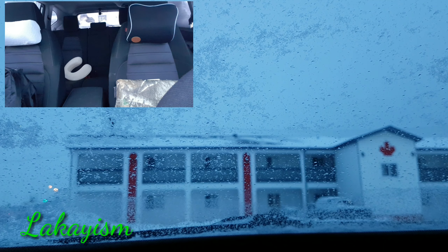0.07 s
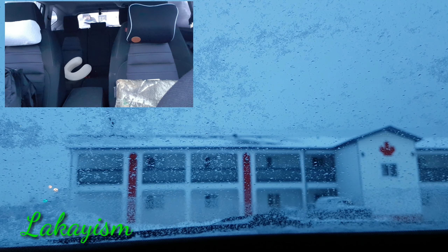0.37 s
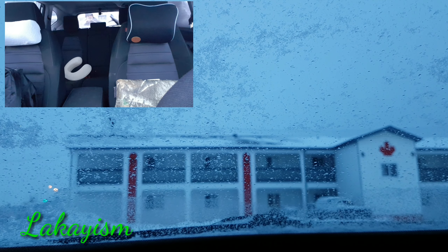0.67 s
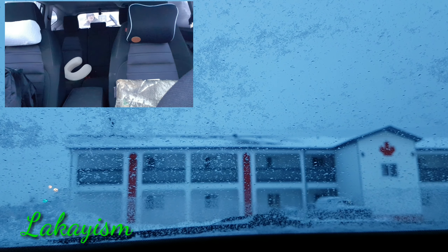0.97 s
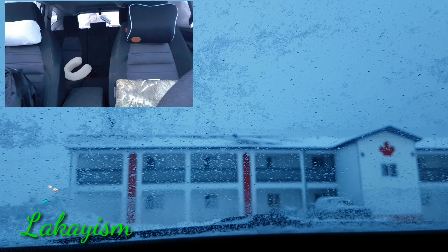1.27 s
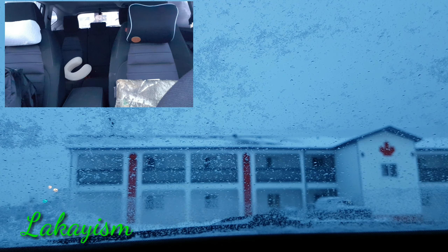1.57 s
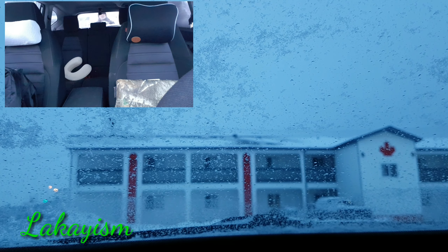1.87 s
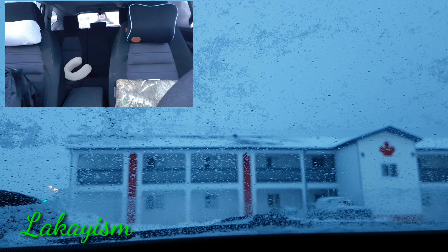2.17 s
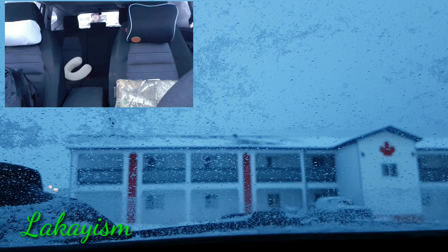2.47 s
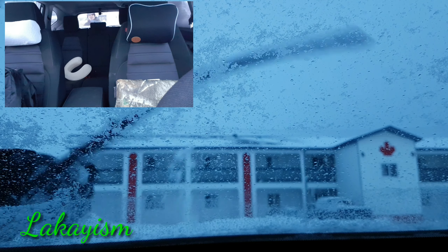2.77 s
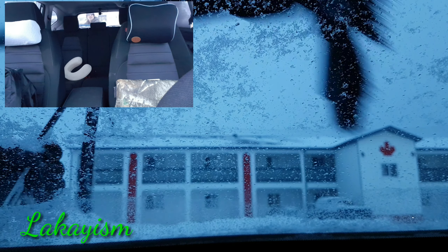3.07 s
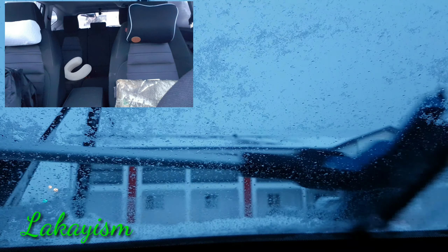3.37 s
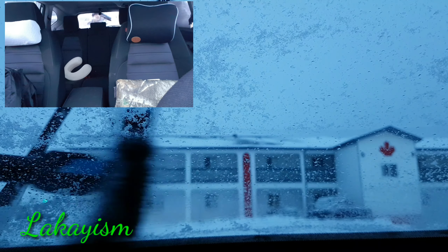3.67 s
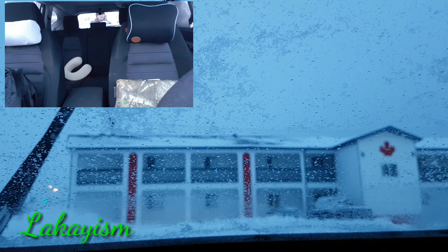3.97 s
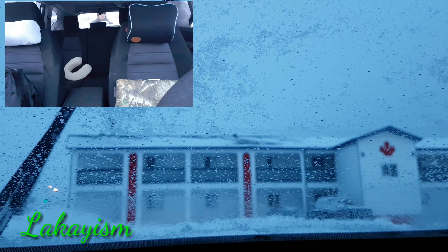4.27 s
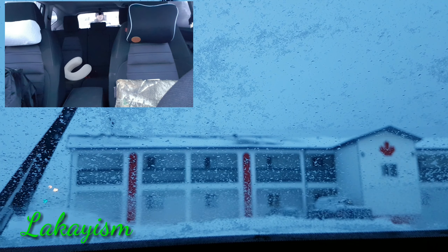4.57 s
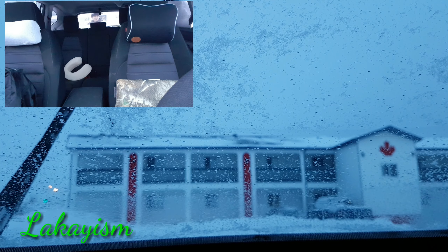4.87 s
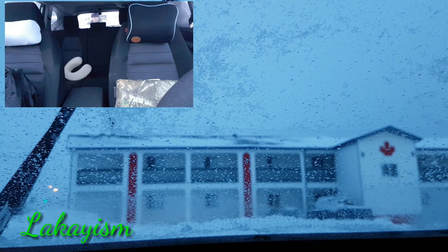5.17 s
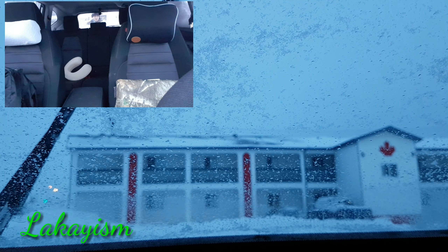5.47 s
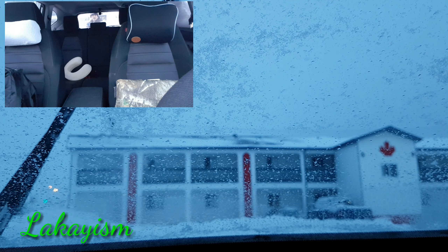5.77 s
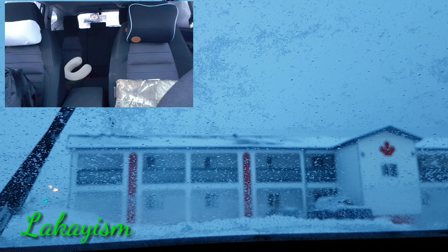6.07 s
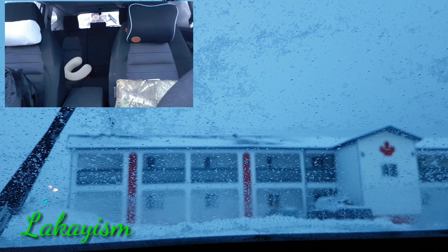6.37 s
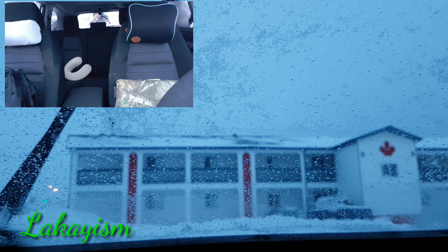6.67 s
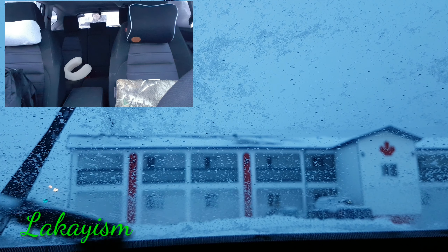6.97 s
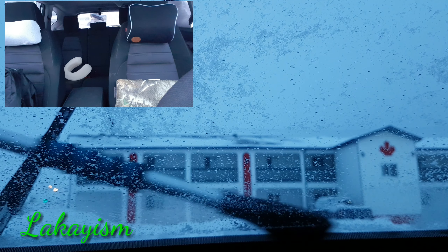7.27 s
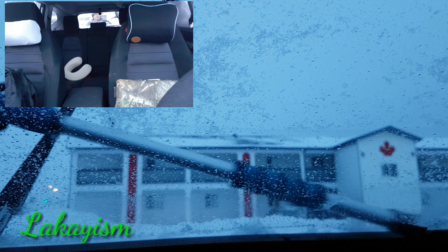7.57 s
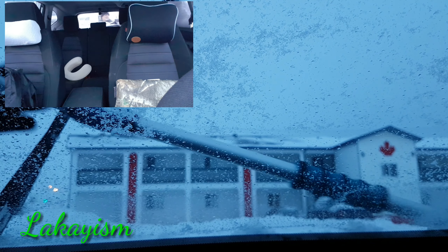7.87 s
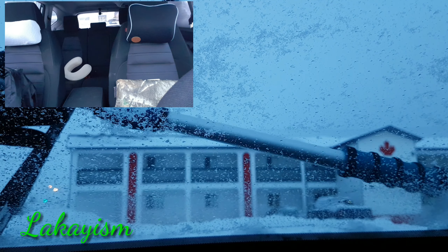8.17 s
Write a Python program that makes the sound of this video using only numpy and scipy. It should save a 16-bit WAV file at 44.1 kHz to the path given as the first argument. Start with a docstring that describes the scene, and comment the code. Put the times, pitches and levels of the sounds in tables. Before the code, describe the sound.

Snow and ice are cleared from a windshield, heard close from inside the car over a steady engine idle and heater rush. A few brief bristly scrapes and thumps come first, followed by a muffled push of snow and a longer sweep. The wiper arm gives several short clinks as it is knocked. Finally, louder gritty scraping and rapid knocks make the glass boom while ice crackles.

```python
"""Snow is swept and scraped off a windshield, heard in the small cabin over the idling engine and heater.
First come short strokes: bristles hiss and crunch over icy glass, and the brush head knocks on the pane.
Snow is shoved aside in a dull rumble, one long sweep swells, and a knocked wiper arm pings.
From about 6 s the scraping turns hard: the pane drums and booms under quick blows that crack the ice."""
import sys
import numpy as np
from scipy import signal
from scipy.fft import rfft, irfft, next_fast_len
from scipy.io import wavfile
from scipy.ndimage import map_coordinates

SR = 44100
rng = np.random.default_rng(int(sys.argv[2]) if len(sys.argv) > 2 else 0)


def store_wav(level_fs):
    """Save 16-bit WAV to argv[1]."""
    pcm = np.round(np.clip(np.atleast_2d(level_fs), -1, 1) * 32767)
    wavfile.write(sys.argv[1], SR, pcm.T.astype(np.int16))


N = 362502
TIME = np.arange(N) / SR

# Brush strokes: start_s, length_s, pressure_db, swell_db, hard_edge_db, loose_snow_db
BRUSH_STROKES = [(0.236, 0.22, -53.5, 9, 7, -5), (0.517, 0.023, -26, 5.5, -7, -7),
                 (0.557, 0.075, -39.5, 0, 4, -10), (0.643, 0.058, -29.5, 3.5, -16, -3.5),
                 (0.709, 0.19, -47, 3, 10.5, -8), (1.155, 0.14, -34, -3, -5, -5),
                 (1.295, 0.033, -32.5, -4, -1, -18), (3.42, 0.9, -42, 6.5, -2, -5.5),
                 (4.22, 0.101, -34.5, -0.5, -2, -6), (4.324, 0.043, -39.5, -7, 2, 1.5),
                 (6.276, 0.033, -19.5, 4, -1.5, -22), (6.417, 0.034, -52, 8, 0, 2),
                 (6.694, 0.13, -21.5, -8.5, -0.5, -25), (7.024, 0.272, -25, 0, -2.5, -20),
                 (7.313, 0.18, -24.5, 0.5, -2.5, -20), (7.508, 0.31, -24, -1, 3, -23),
                 (7.847, 0.035, -41, 12, 10, -14), (7.951, 0.016, -31, 5.5, 8, -18),
                 (7.99, 0.18, -43, -3, -1, -29), (8.12, 0.079, -21.5, 3, 5, -18)]
def stroke_gain(share_db=0, growth=1, land_s=0.0048, lift_s=0.013):
    """The brush lands quickly, presses harder or eases off evenly, and springs off more slowly."""
    gain = np.zeros(N)
    shares_db = share_db + np.zeros(len(BRUSH_STROKES))
    for (start, length, db, swell_db, *_), extra_db in zip(BRUSH_STROKES, shares_db):
        near = slice(max(int((start - 10 * land_s) * SR), 0), int((start + length + 10 * lift_s) * SR))
        t = TIME[near] - start
        fade = np.exp(-np.maximum(-t / land_s, (t - length) / lift_s).clip(0))
        pressure_db = db + swell_db * ((t / length).clip(0, 1) - .5)
        gain[near] = np.maximum(gain[near], amp(growth * pressure_db + extra_db) * fade)
    return gain


# Tone colours of the brush layers: freq_hz, level_db
SCRAPE_EQ = [(900, -45), (1500, -10), (1900, -1), (2350, 3.5), (3000, -2.5), (3600, -7), (4500, -9.5),
             (6000, -22), (9000, -25.5)]  # bristles biting on ice
GRIND_EQ = [(200, -23), (380, -5.5), (650, 3.5), (950, -4), (1300, -4), (1800, -11), (3000, -28.5)]  # throaty hard edge
DRUM_EQ = [(35, -20), (60, -14), (78, -10.5), (105, -8.5), (140, 1), (178, 0), (225, -6.5), (290, -13),
           (450, -17), (1000, -61)]  # low body of the pane
HISS_EQ = [(2500, 1), (4500, 0.5), (6000, 0.5), (7900, 0.5), (9200, -12.5), (12000, -18)]  # bright bristle tips
FIZZ_EQ = [(6000, -20), (9000, -16), (11000, -3.5), (13000, 1.5), (15500, -1)]  # airy loose snow
def brush(hiss_db=-19, drum_db=7, judder_db=2.5, firm_db=-36, pan_db=1):
    """A light sweep hisses evenly; pressed firmly, bristles catch and slip on ice and shake the pane."""
    *_, edge_db, snow_db = np.transpose(BRUSH_STROKES)
    pressure = stroke_gain()
    firm = pressure / (pressure + amp(firm_db))
    judder = amp(judder_db * firm * drift(110))
    catches = .65 * firm * grains(per_s=54, spread_db=-2)  # now and then a ridge of ice gives way
    crunch = unit(grains(per_s=1400, spread_db=4.5) * judder + catches)
    bristles = firm * crunch + np.sqrt(1 - firm ** 2) * rng.standard_normal(N)
    scrape = pressure * unit(tint(bristles, SCRAPE_EQ))
    edge_slips = grains(per_s=830, spread_db=3) * judder
    grind = np.sqrt(firm) * stroke_gain(edge_db) * unit(tint(edge_slips, GRIND_EQ))
    drum = amp(drum_db) * firm * stroke_gain(land_s=0.002, lift_s=0.014) * noise(DRUM_EQ)
    # countless bristle tips and snow crystals sound from all over the brush
    tips = judder * (rng.standard_normal((2, N)) + 0.45 * firm * crunch)
    hiss = amp(hiss_db) * stroke_gain(growth=0.69) * unit(tint(tips, HISS_EQ))
    fizz = stroke_gain(snow_db) * unit(tint(tips, FIZZ_EQ))
    pan = amp(pan_db * np.array([[.5], [-.5]]))
    patches = amp(-0.15 * drift(30))  # the frost lies unevenly
    return pan * patches * (travelling(scrape + grind) + hiss + fizz) + drum


def grains(per_s, spread_db):
    """Tiny slips and breaking ice crystals click at random times and in uneven sizes."""
    size = amp(spread_db * np.minimum(rng.exponential(1, N), 4))
    return unit(size * rng.choice([-1, 1], N) * (rng.random(N) < per_s / SR))


# Blows on the pane: start_s, strength_db, thump_hz, hardness (0-1), ice_db
BLOWS = [(0.554, -8.5, 141, 0, -1), (0.651, -24, 222, 0.89, -15), (0.678, -28.5, 187, .96, 2),
         (0.724, -19.5, 180, 0.76, -8), (1.161, -23, 247, 0.99, -14), (1.172, -10, 170, 0.32, 14.5),
         (1.22, -18, 150, 0.73, 1.5), (1.562, -22, 150, 0, -10), (2.421, -18.5, 198, .72, 10),
         (2.506, -13.5, 166, 0.64, 2), (2.537, -3, 179, 0.27, 2), (2.593, -12, 105, 0.49, -22),
         (2.691, -16, 185, 0.3, -18), (2.95, -30, 156, 0.92, -23), (3.026, -22, 158, 0.69, -22),
         (3.332, -13, 66, 0.61, -9.5), (3.353, -5, 168, 0.52, -6), (3.372, -10, 92, .15, 7),
         (3.433, -18.5, 220, 0.56, -17), (3.543, -30.5, 147, 0.96, -1), (3.92, -8.5, 148, 0, -10),
         (5.193, -11, 244, 0.71, -10), (5.675, -17, 51.6, .15, -15), (5.746, -34, 159, 0.67, 5),
         (5.879, -16, 192, 0.54, -1), (5.886, -16, 290, 0.9, -28), (5.893, -13, 288, 0.74, -11),
         (6.151, -17.5, 172, 0.88, -26), (6.204, -30, 200, 0.91, -17), (6.276, -18.5, 228, 1, -8),
         (6.296, -5, 170, 0.69, -4), (6.318, -6, 125.5, 0.54, -12), (6.689, -12.5, 151, 0.63, 3),
         (6.707, -5.5, 182, 0.52, -5), (6.904, -35, 166, 0.88, -7), (7.002, -17.5, 169, 0.71, -15),
         (7.049, -25.5, 153, 1, -5), (7.108, -13, 141, 0.86, -8), (7.148, -10.5, 231, 0.6, -8),
         (7.227, -15.5, 142, 0.88, -28), (7.285, -14.5, 208, 0.76, -21), (7.416, -9.5, 198, 0.68, -1),
         (7.523, -8.5, 212, .66, -16), (7.6, -12, 79.5, 0.75, -4), (7.626, -6, 70.3, 0.1, -17),
         (7.666, -6, 199, 0.7, 0.5), (7.742, -7.5, 172, 0.61, 2), (7.792, -6.5, 171, 0.74, -3.5),
         (7.814, -2, 181, 0.4, -3), (7.89, -23, 192, 0.71, -4), (7.959, -22.5, 113, 0.82, -17)]
# Glassy snap of the crowded high modes: pitch_ratio, level_db
SNAP_EQ = [(.4, -10.5), (.68, -4.5), (1, 4.5), (1.25, -4.5), (1.55, -15.5), (2.2, -23), (4, -54)]
# Brittle crack of ice: freq_hz, level_db
CRACK_EQ = [(600, 11.5), (1100, 6.5), (1600, 1.5), (2500, 3), (3300, 4), (4500, 4.5), (7700, 2.5),
            (9200, -6), (12000, -2), (15500, 1.5)]
def knocks(thump_db=2, thump_cycles=14, rise_s=0.012):
    """A blow flexes the pane in a low thump; harder ones ring its modes more and crack the ice."""
    t = np.arange(SR // 3) / SR
    out = np.zeros((2, N))
    for start, db, thump_hz, hardness, ice_db in BLOWS:
        clack_db = db + np.interp(hardness, [0, 1], [-22, -2.5])
        snap_db = db + np.interp(hardness, [0, 1], [-46.5, 3])
        clack_hz = 259.4 + 1.38 * thump_hz  # a stiffer spot both thumps and rings higher
        snap_hz = 2574 * np.exp(0.026 * rng.standard_normal())
        centre, side = unit(tint(rng.standard_normal((2, len(t))), DRUM_EQ))
        flex = np.sin(2 * np.pi * thump_hz * t) + 0.5 * centre + 0.16 * np.array([side, -side])
        swing = (1 - np.exp(-t / rise_s)) * amp(-60 * t * thump_hz / thump_cycles)
        thump = amp(db + thump_db) * unit_attack(flex * swing)
        clack = amp(clack_db) * pane_ring(t, clack_hz)
        snap = amp(snap_db) * burst(t, np.array(SNAP_EQ) * [snap_hz, 1], t60=0.068, spike=0.3)
        crack = amp(snap_db + ice_db) * burst(t, CRACK_EQ, t60=0.11, spike=3.9)
        add(out, start, thump + cabin(clack + snap + crack, t60=0.059, wet_db=2.5))
    return out


# Low modes of the windshield: pitch_hz, level_db, t60_s (before extra damping)
PANE_MODES = [(272, 5, 0.087), (381, 5.5, 0.12), (460, -1.5, 0.15), (552, -11, 0.15), (666, -9.5, 0.27),
              (752, -4, 0.063), (774, -9, 0.26), (959, -1, 0.091), (1035, 10, 0.023), (1096, -10, 0.062),
              (1250, 1, 0.036), (1300, -11, 0.052), (1743, 16.5, 0.047), (1970, -7, 0.13)]
def pane_ring(t, centre_hz, width_octaves=0.83, damping=1.06, note_t60=0.062, note_share=0.27):
    """The place of the blow favours one note and those modes of the pane that lie around it."""
    hz, db, t60 = np.transpose(PANE_MODES)[:, :, None]
    weight = np.exp(-.5 * (np.log2(hz / centre_hz) / width_octaves) ** 2) * rng.choice([-1, 1], hz.shape)
    decay = amp(db - 60 * damping * t / t60)
    modes = unit_attack((weight * decay * np.sin(2 * np.pi * hz * t)).sum(0))
    note = unit_attack(np.sin(2 * np.pi * centre_hz * t) * amp(-60 * t / note_t60))
    return unit_attack(note_share * note + (1 - note_share) * modes)


def burst(t, colour, t60, spike):
    """A sharp transient, then a noisy tail of many close modes dying together."""
    envelope = amp(-60 * t / t60) + spike * np.exp(-t / 0.0018)
    return unit_attack(tint(rng.standard_normal(len(t)), colour) * envelope)


# Swell of snow shoved along the foot of the pane: time_s, level_db
SNOW_SHOVE = [(2.59, -18), (2.66, -25), (3.04, -17), (3.08, -32), (3.3, -20.5)]
# Swell of the pane flexing deeply under the brush: time_s, level_db
PANE_SHUDDER = [(7.52, -39), (7.562, -10), (7.644, -12), (7.7, -5.5), (7.8, -20)]
# Bass boom of that flex: freq_hz, level_db
BOOM_EQ = [(40, -30), (62, -23), (75, -2), (90, -1), (125, -33), (300, -84)]
def pushes(shove_db=-4, shudder_db=-6):
    """Pushing on the snow or leaning on the glass shakes the pane in a dull rumble."""
    out = np.zeros((2, N))
    for swell, colour, db in (SNOW_SHOVE, DRUM_EQ, shove_db), (PANE_SHUDDER, BOOM_EQ, shudder_db):
        swell_db = np.interp(TIME, *np.transpose(swell), left=-100, right=-100)
        out += amp(db + swell_db) * noise(colour)
    return out


# Pings of the wiper arm: start_s, pitch_hz, level_db, t60_s
WIPER_PINGS = [(2.951, 2356, -27.5, 0.1), (2.951, 2860, -33, 0.11), (4.301, 3200, -26, 0.07),
               (5.195, 2356, -24, 0.12), (5.196, 2630, -14.5, 0.031), (5.674, 404, -17, 0.1),
               (5.889, 640, -8.5, 0.091), (5.89, 3090, -19, .08), (6.152, 840, -13, 0.048),
               (6.153, 2930, -35, 0.25)]
def wiper(rise_s=0.00098):
    """A knocked wiper arm and its hollow cover ring in short, clear notes."""
    t = np.arange(SR // 4) / SR
    out = np.zeros((2, N))
    for start, hz, db, t60 in WIPER_PINGS:
        envelope = (1 - np.exp(-t / rise_s)) * amp(db - 60 * t / t60)
        add(out, start, envelope * np.sin(2 * np.pi * (hz * t + rng.random((2, 1)) / 5)))
    return out


# Tone colours of the dark engine rumble and the fan's rush of air: freq_hz, level_db
RUMBLE_EQ = [(15, -25), (28, -31), (42, -4), (62, -4.5), (85, -1), (112, -1.5), (150, 1), (215, -1.5),
             (265, -10.5), (350, -7.5), (450, -17), (700, -22), (1500, -59)]
FAN_EQ = [(200, -0.5), (450, 2), (700, -1), (1000, 1), (1400, -7.5), (2000, -10.5), (3100, -18),
          (3700, -22), (5500, -30), (8200, -32), (9200, -47), (11000, -44), (13000, -32), (15500, -36)]
# Hum of engine and fan: pitch_hz, level_db
HUM_TONES = [(43, -38), (85, -34.5), (154, -41), (219, -40.5), (360, -44.5), (722, -55)]
# The background bed dips briefly: time_s, gain_db
BED_DIP = [(0, 0), (6.25, -0.14), (6.5, -3.2), (7, -2), (8.22, -0.5)]
def idling_car(rumble_db=-25.5, fan_db=-36.5, throb_db=1.45, waver_cycles=0.51):
    """Idle rumble and wavering tones come through the body; the heater fan blows evenly over them."""
    rumble = amp(rumble_db + throb_db * drift(25)) * noise(RUMBLE_EQ)
    fan = amp(fan_db) * noise(FAN_EQ)
    hum = sum(amp(db) * unit(np.sin(2 * np.pi * (hz * TIME + waver_cycles * drift(4))))
              for hz, db in HUM_TONES)
    return amp(np.interp(TIME, *np.transpose(BED_DIP))) * (rumble + fan + hum)


def cabin(x, t60, wet_db):
    """Each ear gets the direct sound and its own dense, short reflections from glass and trim."""
    t = np.arange(SR // 10) / SR
    taps = rng.standard_normal((2, len(t))) * (rng.random((2, len(t))) < 4000 / SR) * amp(-60 * t / t60)
    taps *= amp(wet_db) / np.linalg.norm(taps, axis=1, keepdims=True)
    taps[[0, 1], rng.integers(0, 8, 2)] += 1  # direct sound
    return signal.oaconvolve(x[None], taps, axes=1)[:, :len(x)] / np.sqrt(1 + amp(2 * wet_db))


def travelling(x, size=4096):
    """The brush moves over the pane, so its reflections in the cabin keep changing."""
    out, window = np.zeros((2, N)), signal.windows.cosine(size)
    for start in range(0, N - size // 2, size // 2):
        piece = x[start:start + size]
        faded = np.pad(piece * window[:len(piece)], (0, size))
        add(out, start / SR, cabin(faded, t60=0.049, wet_db=12.5))
    return out


# Stereo width, side against mid: freq_hz, side_db
STEREO_WIDTH = [(30, -20), (70, -13.5), (150, -20), (300, -13.5), (600, -4.5), (1200, -0.5), (15000, 0.5)]
def noise(colour):
    """Coloured stereo noise, narrow in the bass and wide in the treble."""
    mid, side = tint(rng.standard_normal((2, N)), colour)
    side = tint(side, STEREO_WIDTH)
    return unit(np.array([mid + side, mid - side]))


def tint(x, points):
    """Filters by an EQ curve of (freq_hz, level_db) points."""
    hz, db = np.transpose(points)
    size = next_fast_len(x.shape[-1])
    gain = amp(np.interp(np.log(np.fft.rfftfreq(size, 1 / SR) + 1), np.log(hz), db))
    return irfft(rfft(x, size) * gain, size)[..., :x.shape[-1]]


def drift(per_s):
    """A random wander of rms 1 that turns about per_s times a second."""
    knots = rng.standard_normal(8192)
    return unit(map_coordinates(knots, [TIME * per_s], order=1, mode="wrap"))


def amp(db):
    """Decibels to gain."""
    return 10 ** (np.asarray(db) / 20)


def unit(x):
    """Scales to rms 1."""
    return x / np.sqrt(np.mean(x ** 2) + 1e-20)


def unit_attack(x, window_s=0.012):
    """Scales a hit to the energy of window_s at rms 1."""
    return x / np.sqrt(np.sum(x ** 2) / (window_s * SR) + 1e-20)


def add(mix, start_s, sound):
    """Lays a sound into the mix."""
    part = mix[:, max(round(start_s * SR), 0):][:, :sound.shape[-1]]
    part += sound[..., :part.shape[-1]]


def scene(left_db=.5):
    """The work on the windshield over the idling car, all a little to the left."""
    snow = brush() + pushes()
    return (idling_car() + snow + knocks() + wiper()) * amp([[left_db], [-left_db]])


def record(dry, ceiling=.88, cutoff_hz=15750):
    """Soft clipping rounds the highest peaks; a low-pass trims the very top."""
    rounded = dry / (1 + (dry / ceiling) ** 4) ** (1 / 4)
    lowpass = signal.firwin(401, cutoff_hz, window=("kaiser", 8), fs=SR)
    return signal.oaconvolve(rounded, lowpass[None], "same", axes=1)


dry = scene()
out = record(dry)
store_wav(out)
```